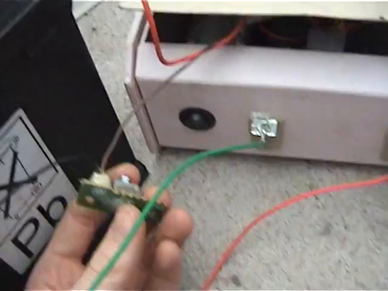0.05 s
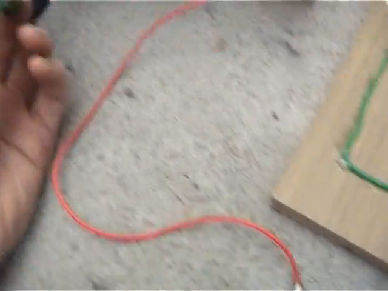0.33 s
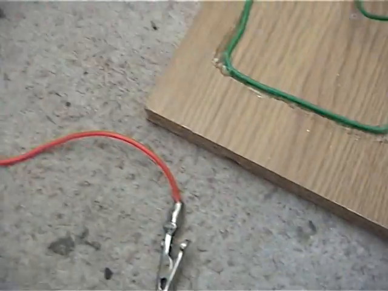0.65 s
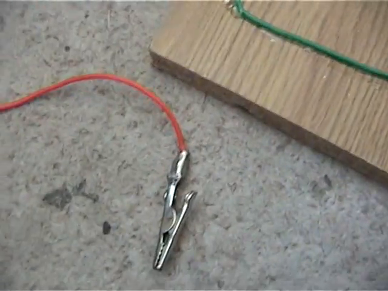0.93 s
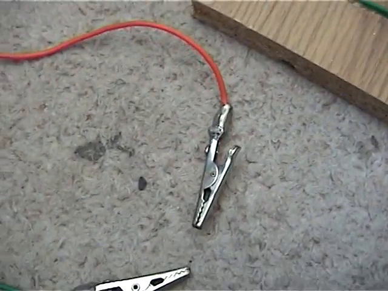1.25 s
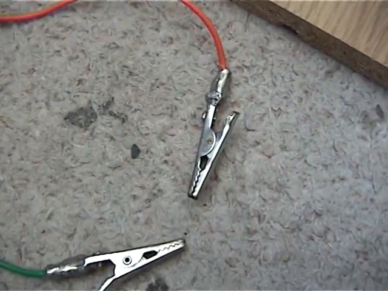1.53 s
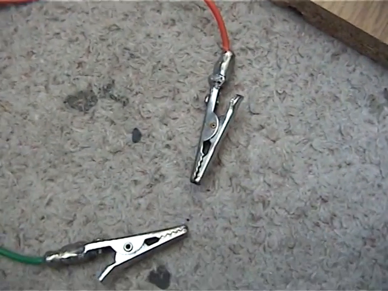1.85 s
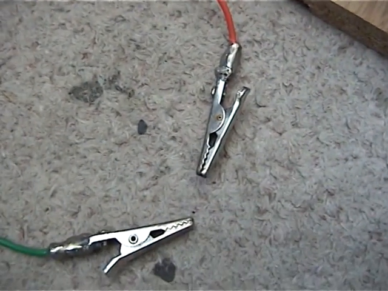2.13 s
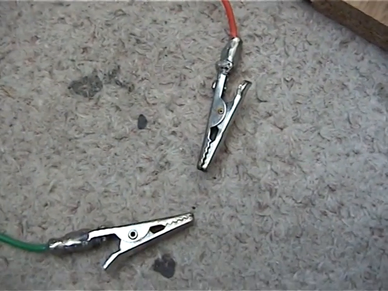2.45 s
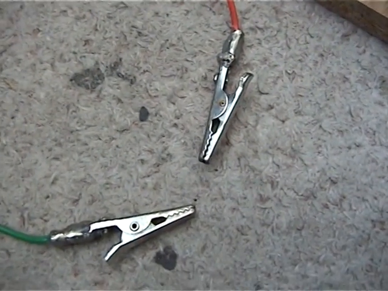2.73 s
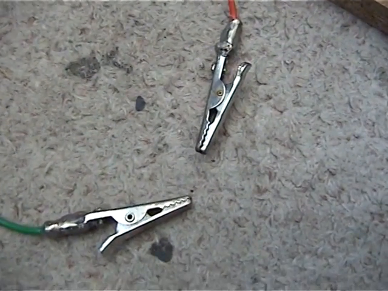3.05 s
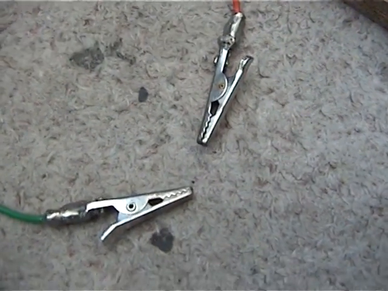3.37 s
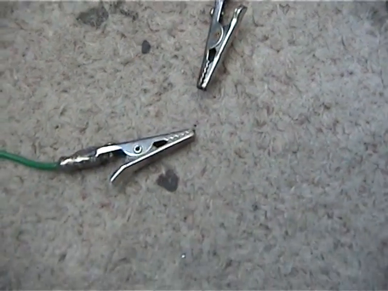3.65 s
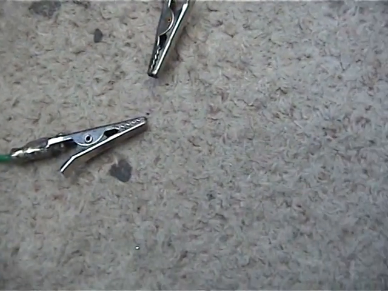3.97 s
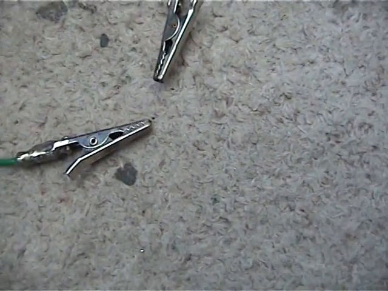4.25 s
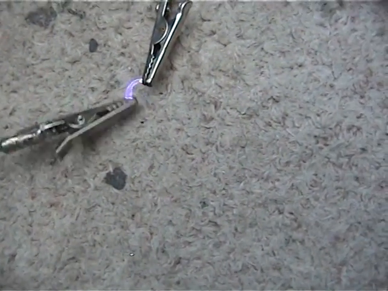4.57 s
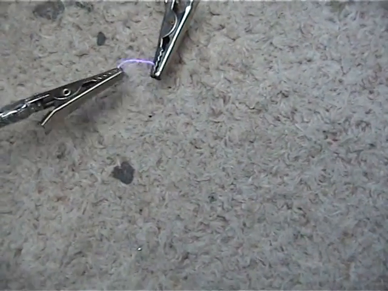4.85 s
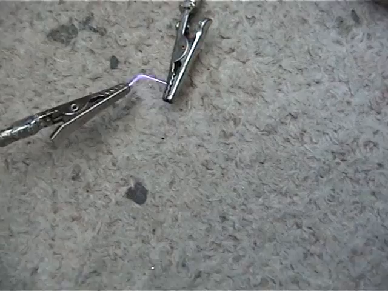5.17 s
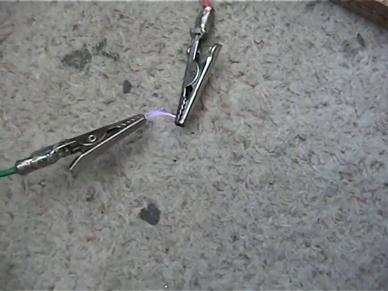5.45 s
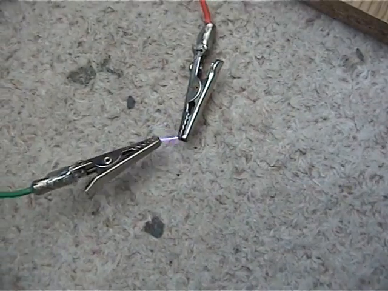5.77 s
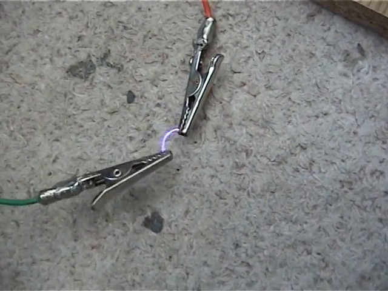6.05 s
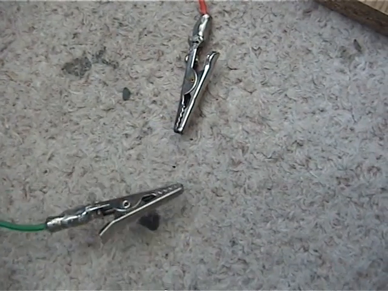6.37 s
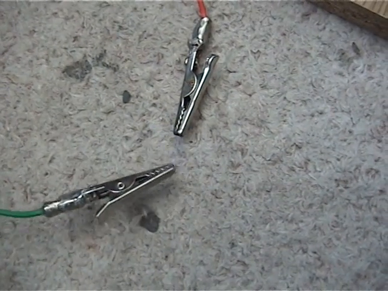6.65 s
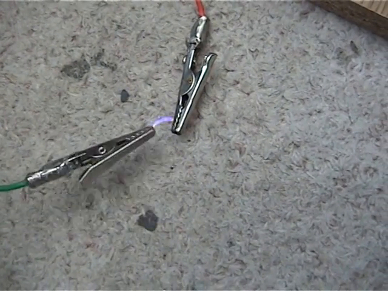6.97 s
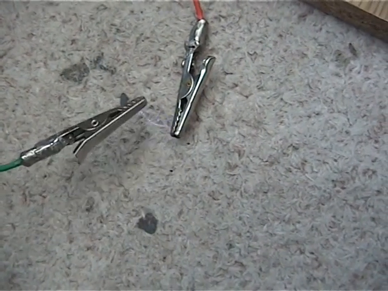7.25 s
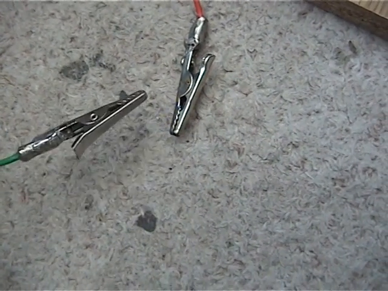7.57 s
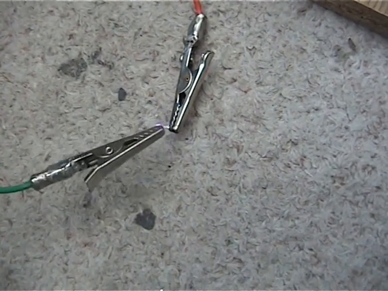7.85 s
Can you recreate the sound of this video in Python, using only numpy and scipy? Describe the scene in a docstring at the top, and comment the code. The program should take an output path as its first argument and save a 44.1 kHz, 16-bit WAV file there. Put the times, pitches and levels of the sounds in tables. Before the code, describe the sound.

A home-built high-voltage generator sparks between two metal clips in a small room, heard close up. After low room rumble and a brief rustle, a short burst of harsh, whining buzz starts and stops. It returns for longer with sharp snaps, then turns into a bright hissing arc with brief squeals and rasping sparks. Whine and hiss keep trading places to the end.

```python
"""High-voltage discharges in a small room

A home-built generator discharges between two crocodile clips on a carpet; each discharge heats a thread
of air, whose sudden expansion is a click. Across a wide gap, streamers fire in step with the oscillator
and whine; nearer, the gap breaks down in a rasp of sparks; closest, it holds a hissing, squealing arc.
Beneath are room rumble, the motor of a nearby camera, two faint tones and a hand sliding on a lead."""
import sys
import numpy as np
from scipy import signal
from scipy.fft import rfft, irfft, next_fast_len
from scipy.io import wavfile
from scipy.ndimage import map_coordinates

SR = 44100
rng = np.random.default_rng(int(sys.argv[2]) if len(sys.argv) > 2 else 0)


def master(y):
    """Save y as 16-bit WAV."""
    cut = np.clip(np.atleast_2d(y).T, -1, 1)
    pcm = np.round(cut * 32767)  # scale
    wavfile.write(sys.argv[1], SR, pcm.astype(np.int16))


N = 353241

# runs of free sparks: (start [s], end [s], rate [1/s], level [dB], treble over level [dB])
SPARK_RUNS = [(1.784, 1.809, 740, -20.5, -5), (3.121, 3.152, 570, -23, -6), (4.513, 4.522, 800, -30.5, 7),
              (4.606, 4.617, 790, -26.5, 4.5), (4.931, 4.957, 650, -34, 9), (5.021, 5.224, 594, -33.5, 7),
              (5.258, 5.525, 540, -34, 6.5), (5.576, 5.594, 830, -36.5, 8.5),
              (5.704, 5.716, 840, -30.5, 4.5), (6.152, 6.181, 880, -31.5, 7), (6.711, 6.724, 640, -31, -.5),
              (6.745, 6.78, 720, -31, 5), (7.094, 7.102, 754, -34.5, 7), (7.205, 7.251, 1230, -26.5, -1),
              (7.253, 7.26, 4450, -28, 0), (7.261, 7.32, 743, -30, 4), (7.323, 7.38, 474, -33.5, 9.5),
              (7.834, 7.898, 490, -32.5, 11), (7.942, 7.962, 850, -31.5, 11)]
# click spectrum of a spark: (frequency [Hz], level [dB])
SPARK_SPECTRUM = [(100, -30), (500, -12), (950, -7), (1700, -5.5), (3400, -1.5), (4300, -1), (5500, -2),
                  (6900, 0.5), (8500, 14.5), (10700, 21.5), (13500, 17.5), (14900, 16), (15800, -44)]
# single hard snaps: (time [s], level [dB])
SNAPS = [(2.271, -7), (2.3495, -7), (3.524, -4), (3.912, -8), (4.446, -5), (4.449, -5), (4.4757, -8),
         (4.4824, -7), (6.2085, -15), (6.2245, -11), (6.604, -13), (6.607, -12), (7.392, -7), (7.3985, -9),
         (7.758, -9)]
# breakdowns of the gap by a run of sparks: (time [s], thud level [dB])
BREAKDOWNS = [(1.786, -24), (3.121, -26), (4.952, -41), (5.025, -35), (6.713, -51), (7.094, -46),
              (7.831, -29)]


def amp(db):
    """Decibels as an amplitude ratio."""
    return 10 ** (np.asarray(db) / 20)


def along(points, hz):
    """Interpolation of (frequency, value) points on a logarithmic frequency axis."""
    knots, values = np.transpose(points)
    return np.interp(np.log(hz + 1), np.log(knots), values)


def curve(points, t):
    """Linear interpolation of (time, value) points."""
    return np.interp(t, *np.transpose(points))


def gate(t, start, end, fade_s):
    """A trapezoidal window from start to end."""
    return np.clip(np.minimum(t - start, end - t) / fade_s + .5, 0, 1)


def spell(rows, t):
    """For each time: whether a (start, end, ...) row is sounding, its age, and its other columns."""
    rows = np.array(rows)
    latest = np.maximum(np.searchsorted(rows[:, 0], t) - 1, 0)
    start, end, *columns = rows[latest].T
    return (t > start) & (t < end), t - start, *columns


def chance(t):
    """White Gaussian noise sampled at the times t."""
    return rng.standard_normal(N)[np.clip((t * SR).astype(int), 0, N - 1)]


def wobble(t, rate):
    """Slow random modulation: a spline through rate Gaussian knots a second."""
    return map_coordinates(rng.standard_normal(int(N * rate / SR) + 4), [t * rate], mode="nearest")


def filtered(x, response):
    """Zero-phase filtering: the spectrum of x times a function of frequency."""
    size = next_fast_len(N + SR // 4)
    return irfft(rfft(x, size) * response(np.fft.rfftfreq(size, 1 / SR)), size)[..., :N]


def impulses(times, sizes):
    """Band-limited impulses: windowed sinc pulses that may fall between samples."""
    position = times[:, None] * SR
    index = np.floor(position).astype(int) + np.arange(-7, 9)
    pulses = sizes[:, None] * np.sinc(index - position) * np.sinc((index - position) / 8)
    return np.bincount(np.clip(index, 0, N).ravel(), pulses.ravel(), N + 1)[:N]


def noise(spectrum, correlation):
    """Partly coherent stereo noise of rms 1: the ratio of mid to side sets the correlation."""
    def response(hz):
        angle = np.arccos(np.clip(along(correlation, hz), -1, 1)) / 2
        return amp(along(spectrum, hz)) * [np.cos(angle), np.sin(angle)]
    mid, side = filtered(rng.standard_normal((2, N)), response)
    pair = np.array([mid + side, mid - side])
    return pair / np.sqrt(np.mean(pair ** 2) + 1e-20)


def hum(t, clock, hz, db):
    """A sinusoid, phase-modulated by an unsteady clock and wavering in level."""
    return np.sqrt(2) * amp(db + wobble(t, 3.07)) * np.sin(2 * np.pi * hz * clock)


def room_rumble(t):
    """Ambient noise, mostly at low frequencies, that sinks away."""
    # ambient spectrum: (frequency [Hz], level [dB])
    spectrum = [(15, -44.5), (28, -3), (50, -10), (80, -12.5), (125, -7), (280, -4.5), (400, -6.5),
                (520, -10.5), (900, -14.5), (1800, -19.5), (2800, -21.5), (5500, -30.5), (11500, -34),
                (14000, -50)]
    # likeness of left and right: (frequency [Hz], correlation [1])
    correlation = [(60, 0.05), (110, 0.65), (200, 0.57), (380, 0.63), (700, 0), (1300, 0), (2400, 0.16),
                   (10000, 0.04)]
    # course of the rumble: (time [s], level [dB])
    envelope = [(0, -48.5), (1.75, -49.5), (2.3, -59.5), (2.5, -50), (3.1, -50.5), (3.7, -62.5), (4.6, -61),
                (5.6, -70.5), (7.3, -65), (8, -66)]
    return amp(curve(envelope, t) + 0.84 * wobble(t, 10)) * noise(spectrum, correlation)


def camera_motor(t, clock):
    """Nearly periodic rotation radiates a line spectrum."""
    # motor partials: (frequency [Hz], level [dB])
    partials = [(150, -83.5), (225, -78), (375, -71), (600, -73), (1124, -73.5), (1798, -72), (2699, -71),
                (3601, -74), (4199, -72.5), (7499, -78), (8102, -97), (11100, -78), (11402, -85)]
    return sum(hum(t, clock, hz, db) for hz, db in partials)


def faint_tones(t, clock):
    """Two nearly pure tones fade in and out."""
    # spells of a tone: (start [s], end [s], frequency [Hz], level [dB])
    tones = [(.37, .66, 3300, -68), (1.0, 1.42, 3300, -70), (.3, .7, 899, -69), (4.4, 6.2, 899, -61),
             (6.7, 8.1, 899, -64.5)]
    return sum(gate(t, start, end, fade_s=.12) * hum(t, clock, hz, db) for start, end, hz, db in tones)


def hand_rustle(t):
    """Sliding friction of a hand on the lead makes bright, fluttering noise."""
    # strokes of the hand: (start [s], end [s], level [dB])
    strokes = [(0.291, 0.348, -49), (.345, .53, -59)]
    # friction spectrum: (frequency [Hz], level [dB])
    spectrum = [(1000, -24), (3000, -8.5), (7000, -2), (9500, -3), (12500, -7), (14000, -38)]
    envelope = sum(amp(db) * gate(t, start, end, fade_s=0.028) for start, end, db in strokes)
    return envelope * amp(1.48 * wobble(t, 120.0)) * noise(spectrum, correlation=[(1000, 0.39)])


def background():
    """Superposition of the quiet sources; all the tones share one slight flutter."""
    t = np.arange(N) / SR
    rumble = room_rumble(t)
    clock = t + 2e-5 * wobble(t, 9)
    return rumble + camera_motor(t, clock) + faint_tones(t, clock) + hand_rustle(t)


def reflections(x, near_db=-8, near_t60_s=.03, tail_db=-18):
    """Early scattering from clips, board and camera, and a short reverberant tail from the walls."""
    # reverberation time: (frequency [Hz], time to fall 60 dB [s])
    t60 = [(200, 0.25), (2000, 0.46), (12000, 0.18)]
    hz, t, spectra = signal.stft(rng.standard_normal((2, SR // 4)), SR, nperseg=256)
    tail = signal.istft(spectra * amp(-60 * t / along(t60, hz)[:, None]), SR, nperseg=256)[1]
    t = np.arange(tail.shape[1]) / SR
    near = rng.standard_normal(tail.shape) * amp(-60 * t / near_t60_s) * (t > .0003)
    response = sum(amp(db) * part / np.linalg.norm(part, axis=1, keepdims=True)
                   for db, part in [(near_db, near), (tail_db, tail)])
    return signal.oaconvolve(x[None], response, axes=1)[:, :N]


def at_microphone(direct):
    """Direct and reflected sound add at two ports; their level difference places the gap."""
    # how unlike the ports hear the reflections: (frequency [Hz], side gain [dB])
    width = [(500, 4.5), (1300, -9.5), (2400, -11), (4400, 0.5), (12000, -1)]
    # hollow colour common to all discharges: (frequency [Hz], gain [dB])
    colour = [(800, -0.5), (1080, 3), (1280, -0.5), (1620, 2), (2000, -0.5), (2500, 0.5)]
    # channel balance: (frequency [Hz], left minus right [dB])
    balance = [(60, 6), (400, -2), (1000, 1.9), (2300, -2), (5000, 3), (9000, 1.5), (15000, 2.2)]
    # the gap shifts before the camera: (time [s], left minus right [dB])
    pan = [(3.7, -0.7), (4.7, 0.7), (5.4, 1), (5.8, 0)]
    left, right = reflections(direct)
    side = filtered((left - right) / 2, lambda hz: amp(along(width, hz)))
    pair = direct + (left + right) / 2 + np.array([side, -side])
    heard = filtered(pair, lambda hz: amp(along(colour, hz) + np.outer([.5, -.5], along(balance, hz))))
    return heard * amp(np.outer([.5, -.5], curve(pan, np.arange(N) / SR)))


def click_bands(spectrum, size=1024, crossover_hz=7000):
    """A minimum-phase click, made by folding the cepstrum, split into body and treble of energy 1 each."""
    hz = np.fft.rfftfreq(size, 1 / SR)
    cepstrum = irfft(np.log(amp(along(spectrum, hz))))
    cepstrum[1:size // 2] *= 2
    cepstrum[size // 2 + 1:] = 0
    click = np.exp(rfft(cepstrum))
    highpass = 1 / (1 + (crossover_hz / (hz + 1)) ** 12)
    bands = np.roll(irfft(click * [1 - highpass, highpass]), size // 2, axis=1)
    return bands / np.linalg.norm(bands, axis=1, keepdims=True)


def discharges(times, sizes, treble_db, spectrum):
    """Thermal expansion: each discharge heats a thread of air and clicks, brighter when hotter."""
    def clicks(strengths, band):
        return signal.oaconvolve(impulses(times, strengths), np.append(band, 0), "same")
    body, treble = click_bands(spectrum)
    return -clicks(sizes, body) - clicks(sizes * amp(treble_db), treble)


def firings(hz, mean_cycles, scatter, jitter_s=0, stall_s=0, memory=0):
    """Relaxation oscillation: the gap charges for whole cycles, then fires. Gives times and waits [s]."""
    t = np.arange(N) / SR
    # a hot channel (memory near 1) keeps its rhythm for milliseconds; a cold one decides afresh
    deviation = memory * wobble(t, 170) + np.sqrt(max(0, 1 - memory ** 2)) * chance(t)
    cycles = np.maximum(1, np.round(mean_cycles + scatter * deviation))
    slip = jitter_s * mean_cycles * scatter * chance(t)  # long, uncertain charges blur the pitch
    wait = np.maximum(stall_s + cycles / hz + slip, 1 / SR)
    times = [0]
    while times[-1] < t[-1]:
        times.append(times[-1] + wait[int(times[-1] * SR)])
    return np.array(times[1:]), np.diff(times)


def between_sparks(times):
    """True where no run of free sparks drains the gap."""
    return ~spell(SPARK_RUNS, times)[0]


def thuds(hz=55, t60_s=0.024, rise_s=0.00074, gain_db=1.5, snap_offset_db=-36):
    """A breakdown or snap comes with one low, damped thud, out of phase between left and right."""
    t = np.arange(SR // 4) / SR
    phase = 0.84 * np.array([[1], [-1]])  # the left leads, the right lags
    envelope = amp(-60 * t / t60_s) * (1 - np.exp(-t / rise_s))
    thud = np.sin(2 * np.pi * hz * t + phase) * envelope
    strength = np.linalg.norm(thud, axis=1, keepdims=True)
    times, levels = np.transpose(list(BREAKDOWNS) + [(s, db + snap_offset_db) for s, db in SNAPS])
    onsets = impulses(times, amp(levels + gain_db))
    return signal.oaconvolve(onsets[None], thud * strength.mean() / strength, axes=1)[:, :N]


def snaps():
    """Dielectric breakdown: now and then one full spark jumps the wide gap."""
    times, db = np.transpose(SNAPS)
    return discharges(times, amp(db + .5), treble_db=1.5, spectrum=SPARK_SPECTRUM)


def sparks(cold_gap_db=7.5, warming_s=0.0087):
    """Free relaxation oscillation: the gap recharges and breaks down in a rasp, less evenly when slow."""
    runs = []
    for start, end, rate, db, treble_db in SPARK_RUNS:
        unevenness = .145 * min(1, 1150 / rate) ** 2
        waits = np.exp(unevenness * rng.standard_normal(size=200))  # in nominal periods
        t = start + (np.cumsum(waits) - waits[0]) / rate
        # sparks are stronger around a breakdown, while the air is cold
        cold = sum(np.exp(-abs(t - s) / warming_s) for s, _ in BREAKDOWNS)
        sizes = amp(db + cold_gap_db * cold) * np.sqrt(waits * SR / rate / 2)
        runs.append(np.array([t, sizes, np.full(len(t), treble_db)])[:, t <= end])
    return discharges(*np.hstack(runs), SPARK_SPECTRUM)


def squealing(t):
    """Subharmonic locking: 1 while a freshly lit arc squeals on every second cycle, otherwise 0."""
    # squeals: (start [s], end [s])
    squeals = [(4.515, 4.59), (5.0, 5.03), (5.755, 5.788), (6.79, 6.852)]
    return sum(gate(t, start, end, fade_s=.014) for start, end in squeals)


def flaring(t, fall_s=0.019):
    """Treble lift of the hiss [dB]: each flare is a Gaussian with its own rise and a quick collapse."""
    # flares of the arc: (peak time [s], rise [s], treble lift [dB])
    flares = [(4.715, 0.0099, 6), (4.81, 0.045, 6), (4.872, 0.038, 7), (4.93, 0.033, 9),
              (5.02, 0.019, 11.5), (5.578, 0.017, 7), (5.657, 0.023, 7.5), (5.758, 0.042, 12),
              (5.885, .015, 3.5), (5.912, 0.0078, 11.5), (5.995, 0.029, 7), (6.039, 0.038, 7),
              (6.14, 0.07, 8.5), (6.91, 0.022, 4.5), (6.975, 0.027, 9), (7.088, 0.03, 8.5),
              (7.153, .035, 9), (7.98, .03, 1)]
    return sum(db * np.exp(-((t - peak) / np.where(t < peak, rise, fall_s)) ** 2)
               for peak, rise, db in flares)


def arc(hiss_hz=5920, squeal_hz=6100, writhe_cycles=.2):
    """Reignition: the hot channel relights every two or three cycles; its writhing bends the pitch."""
    # standing arc: (start [s], end [s], level [dB], drift [dB/s], treble over level [dB])
    spells = [(4.521, 5.024, -31.5, -5, 2), (5.228, 5.257, -38.5, 0, 8), (5.527, 5.75, -37, -6.5, 2),
              (5.75, 6.15, -40, 9, 3), (6.783, 7.204, -34, -4, 3), (7.9, 8.01, -36.5, 5, 10.5)]
    # click spectrum of a reignition: (frequency [Hz], level [dB])
    spectrum = [(100, -12.5), (500, -3), (1000, 1), (1700, 3.5), (2600, 4), (3500, 9), (4200, 3),
                (5400, 9.5), (6600, 2), (7600, 13.5), (10600, 18.5), (12000, 17.5), (13400, 17.5),
                (14900, 10.5), (15600, -7)]
    t = np.arange(N) / SR
    lock = squealing(t)
    blend = lambda hiss, squeal: hiss + lock * (squeal - hiss)
    oscillator_hz = blend(hiss_hz, squeal_hz) * (1 + blend(.024, .018) * wobble(t, 85))
    cycles = blend(2.62 + writhe_cycles * wobble(t, 40), 2)
    times, waits = firings(oscillator_hz, cycles, scatter=blend(.58, .24),
                           jitter_s=1.45e-5, stall_s=3.8e-5, memory=.68)
    on, age, db, drift, treble_db = spell(spells, times)
    squeal = squealing(times)
    sizes = amp(db + drift * age + 0.5 * squeal + chance(times)) * np.sqrt(waits * SR)
    flicker_db = 1.2 * wobble(times, 55)
    hiss_db = treble_db + flaring(times) - 2.5 * squeal + flicker_db  # a squeal is duller
    return discharges(times, sizes * on * between_sparks(times), hiss_db, spectrum)


def streamers(usual_hz=2200.6, sag_db_per_hz=0.05, scatter_cycles=.74):
    """Phase locking: streamers skip cycles at random but keep step with the oscillator, and so whine."""
    # streamers across the wide gap: (start [s], end [s], level [dB], drift [dB/s],
    # treble over level [dB], charging time [cycles])
    spells = [(1.81, 2.353, -25, -1.5, -2, 1.63), (3.153, 4.509, -27.5, -3, -.7, 2.01),
              (6.184, 6.742, -36.5, 3.5, -4, 2.55), (7.378, 7.832, -39.5, 12, 6.5, 2.09)]
    # the oscillator sags as the clips part, one curve a spell: (time [s], frequency [Hz])
    pitch_curves = [
        [(1.81, 2221), (2.034, 2212), (2.042, 2206), (2.35, 2194)],
        [(3.15, 2206), (3.732, 2188), (4.258, 2206), (4.478, 2217), (4.49, 2259)],
        [(6.19, 2195), (6.22, 2128), (6.368, 2086), (6.652, 2174), (6.74, 2217)],
        [(7.4, 2072), (7.412, 2092), (7.494, 2077), (7.648, 2088), (7.79, 2158)],
    ]
    # steadier rhythms: (start [s], end [s], charging time [cycles], scatter [cycles])
    locks = [(6.289, 6.46, 1.43, 0.34), (7.538, 7.629, 2, 0.33), (7.755, 7.85, 3.1, .6)]
    # click spectrum of a streamer: (frequency [Hz], level [dB])
    spectrum = [(60, -29), (250, -32), (450, -7.5), (750, -4.5), (1150, -8), (1550, 0), (2200, -0.5),
                (3300, 0), (4400, -0.5), (6700, 1), (8500, 8.5), (12500, 6), (14800, 0.5), (15600, -7)]
    t = np.arange(N) / SR
    pitch = np.vstack(pitch_curves)
    oscillator_hz = curve(pitch, t) * (1 + .0018 * wobble(t, 60))
    cycles, scatter = spell(spells, t)[-1], scatter_cycles
    for start, end, locked_cycles, locked_scatter in locks:
        lock = gate(t, start, end, fade_s=.05)
        cycles = cycles + lock * (locked_cycles - cycles)
        scatter = scatter + lock * (locked_scatter - scatter)
    times, waits = firings(oscillator_hz, cycles, scatter, jitter_s=1e-5)
    on, age, db, drift, treble_db, _ = spell(spells, times)
    sag_db = sag_db_per_hz * (curve(pitch, times) - usual_hz)  # weaker as the pitch sags
    uneven_db, glint_db = .9 * chance(times), 1.1 * chance(times)
    # a longer charge makes a bigger click
    sizes = amp(db + drift * age + sag_db + uneven_db) * np.sqrt(waits * SR)
    return discharges(times, sizes * on * between_sparks(times), treble_db + glint_db, spectrum)


def scene():
    """Superposition of the discharges in the room, their thuds and the background."""
    gap = streamers() + arc() + sparks() + snaps()
    return at_microphone(gap) + thuds() + background()


def record(dry):
    """Band limiting: the camera cuts off the highest treble with a steep low-pass."""
    cutoff_hz = 15350
    return filtered(dry, lambda hz: 1 / (1 + (hz / cutoff_hz) ** 160))


dry = scene()
out = record(dry)
master(out)
```